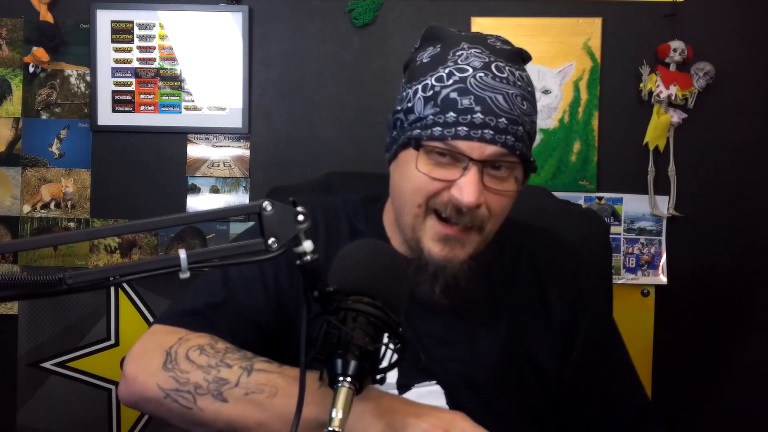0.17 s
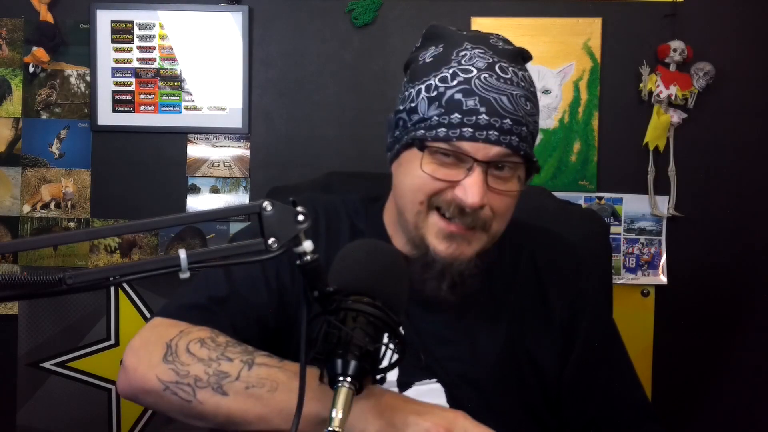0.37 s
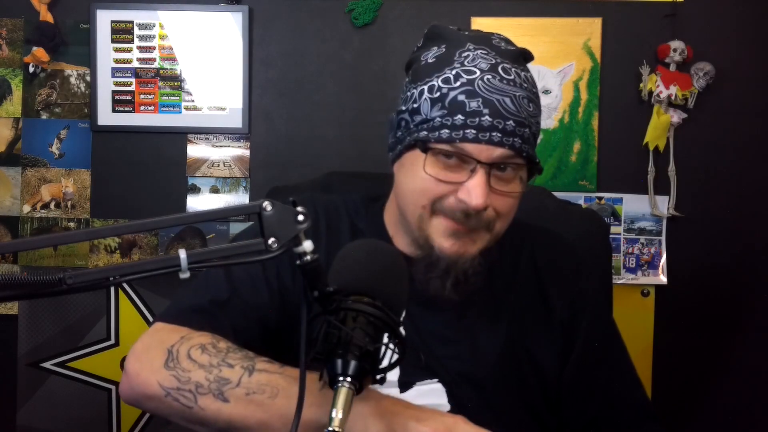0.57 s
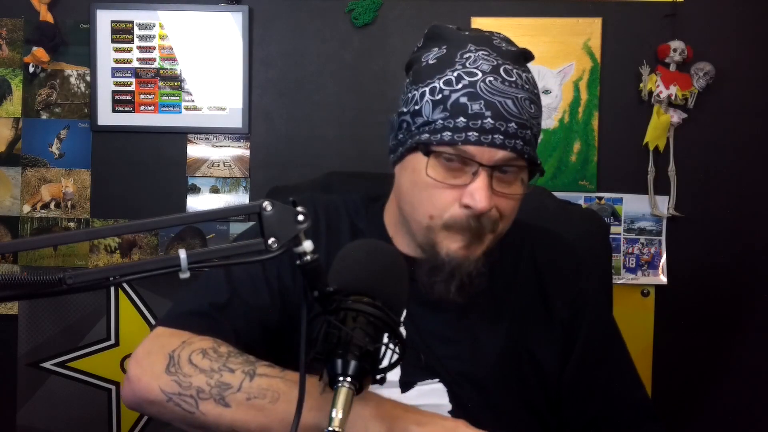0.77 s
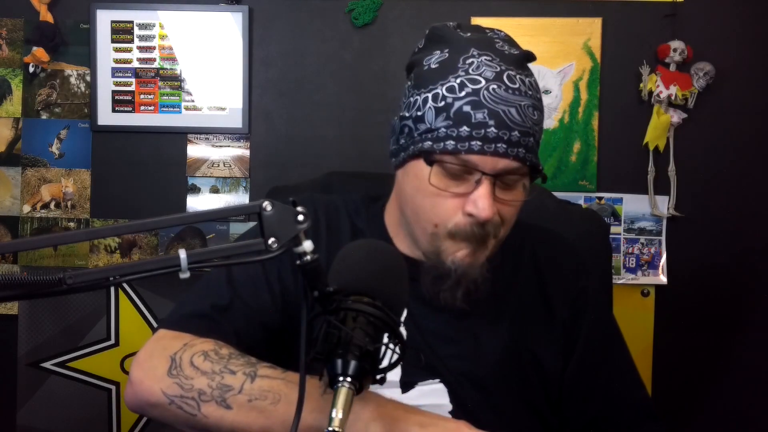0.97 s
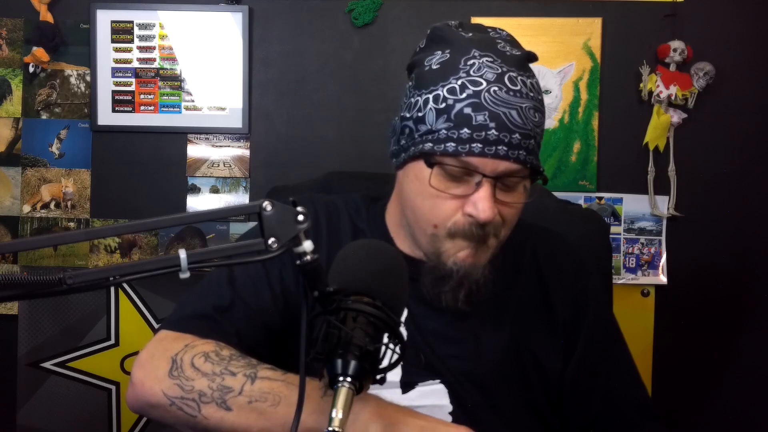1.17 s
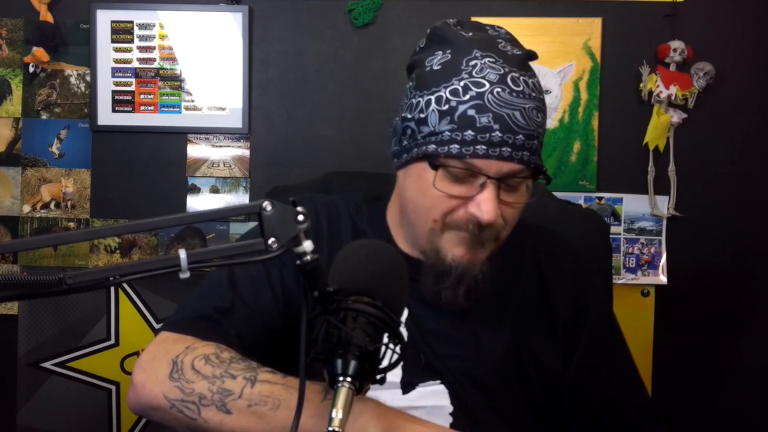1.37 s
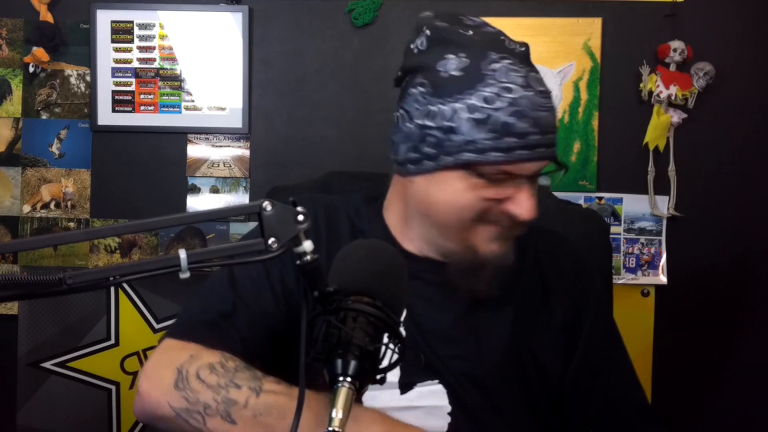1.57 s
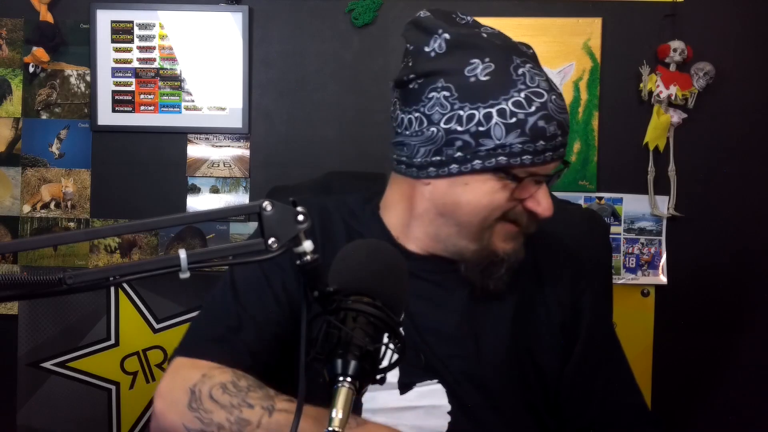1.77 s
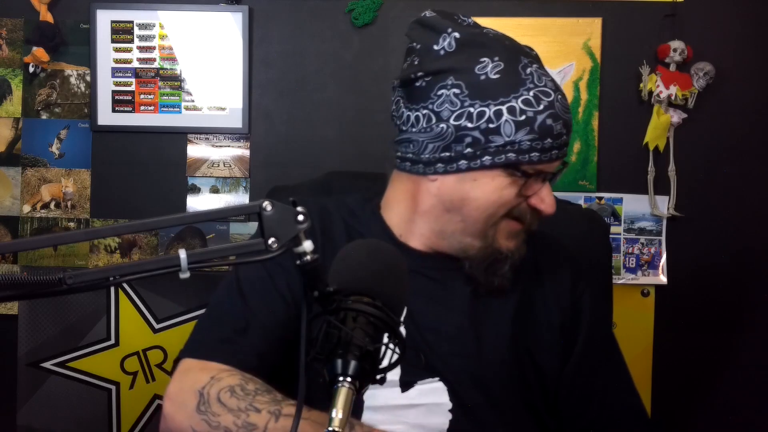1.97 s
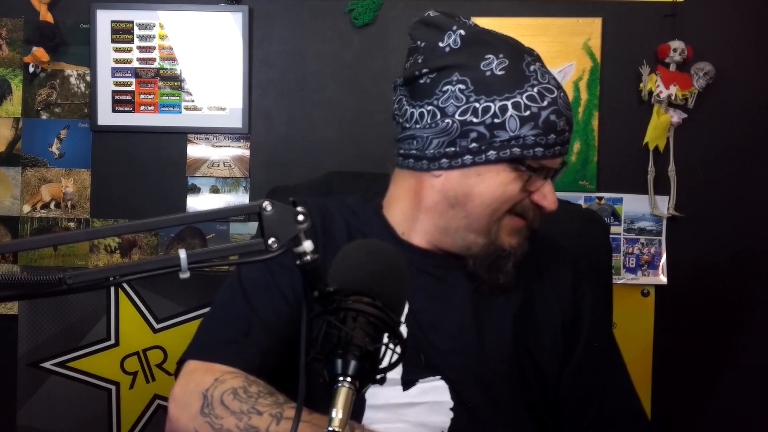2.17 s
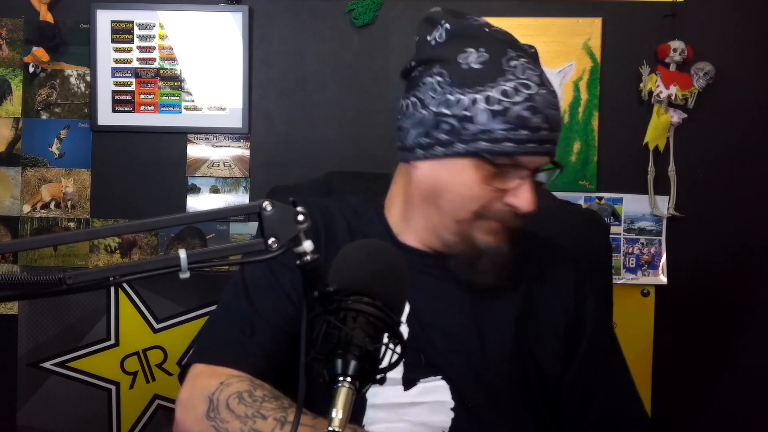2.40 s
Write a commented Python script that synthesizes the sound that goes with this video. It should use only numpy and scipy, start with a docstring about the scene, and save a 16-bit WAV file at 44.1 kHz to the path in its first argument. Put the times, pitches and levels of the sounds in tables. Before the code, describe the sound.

A drink can gives two sharp metallic clicks at its tab, with dull bumps coming through a desk. Faint ticks follow over a low hum, until the can clatters down loudly, ringing briefly in a small room.

```python
"""First a pull tab snaps and rings among soft thumps; then the aluminium can's lid cracks and ticks faintly.
At the end the can lands with a loud clatter. Thin metal giving way or hitting makes bursts of
noise, and its vibration makes the ringing. The thumps come through the desk, over a low wavering hum.
A small hard room prolongs every click, and the loudest peaks are squashed."""
import sys
import numpy as np
from scipy import signal
from scipy.fft import rfft, irfft, next_fast_len
from scipy.io import wavfile
from scipy.ndimage import map_coordinates

SR = 44100
rng = np.random.default_rng(int(sys.argv[2]) if len(sys.argv) > 2 else 0)


def bounce(signal):
    """Save signal as a 16-bit WAV file at the path given by the first command-line argument."""
    frames = np.transpose(np.atleast_2d(signal))
    limited = np.clip(frames, -1, 1)
    pcm = np.round(limited * 32767).astype(np.int16)
    wavfile.write(sys.argv[1], SR, pcm)


N = 107427
TIME = np.arange(N) / SR

# How strong the snap is from bass to treble (frequency [Hz], relative level [dB])
SNAP_TONE = [(200, -38), (420, -58), (560, -32), (940, -30), (1740, -13), (2470, -24.5), (2900, -16.5),
             (3180, -17), (3550, 1), (3960, -12), (5010, -7.5), (5800, -17.5), (7500, -15), (8300, -11.5),
             (10900, -10.5), (11800, -23), (14500, -27), (15500, -44)]
# How wide the snap sounds (frequency [Hz], side level over middle [dB])
SNAP_WIDTH = [(60, -17), (130, -11), (290, -10), (640, -28), (1410, -13), (3100, -3), (6820, 1),
              (15000, -30)]
# The lid's own notes; a fade time is a drop of 60 dB (pitch [Hz], relative level [dB], fade time [s])
LID_NOTES = [(1793, -23, .4), (2922, -3.5, .3), (3454, -5, .3), (3478, 0, .35), (3518, -1, .33),
             (3676, -11, .3), (5202, -11, .22), (8358, -13, .26), (9767, -14, .22)]


def tab_snap(start=0.1067):
    """The tab gives way with a snap and sets the lid ringing."""
    body = burst(start, SNAP_TONE, SNAP_WIDTH, hold_s=0.059, grain_db=-0.5, sag_db_per_s=54)
    ringing = amp(-1) * ring(LID_NOTES, start)
    return amp(-17) * (body + ringing + sharp_click(start, db=2.5, fade_s=0.084))


# How strong the crack is from bass to treble (frequency [Hz], relative level [dB])
CRACK_TONE = [(120, -74), (200, -50), (293, -50), (414, -61), (618, -21.5), (1070, -25), (2130, -11),
              (2750, -20), (3180, -11.5), (4260, -14.5), (5390, -9), (6130, -11), (9480, -2),
              (14700, -24.5), (15500, -49)]
# How wide the crack sounds (frequency [Hz], side level over middle [dB])
CRACK_WIDTH = [(60, -17), (130, -13), (290, -9), (640, -21), (1410, -11.5), (3100, -2.5), (6820, 0.5),
               (15000, -27)]


def lid_crack(start=0.4495):
    """The lid cracks with a bright crunch and hardly rings."""
    body = burst(start, CRACK_TONE, CRACK_WIDTH, hold_s=0.05, grain_db=0, sag_db_per_s=40)
    ringing = amp(-27) * ring(LID_NOTES, start)
    return amp(-17.5) * (body + ringing + sharp_click(start, db=3, fade_s=0.028))


# Each hit of the landing can (time [s], level [dB])
LANDING_HITS = [(2.3285, -13.5), (2.3394, -15), (2.362, -23), (2.378, -19.5), (2.397, -22.5)]
# How strong a hit is from bass to treble (frequency [Hz], relative level [dB])
HIT_TONE = [(60, -38), (100, -8), (160, -8), (243, -11), (440, -11), (880, -8.5), (1100, -11.5),
            (1840, -11.5), (2400, -7.5), (3250, -.5), (4560, -10), (6500, -8.5), (8400, -1.5),
            (9700, -14.5), (11000, -5), (12000, -14.5), (13800, -13), (15500, -15)]
# How wide a hit sounds (frequency [Hz], side level over middle [dB])
HIT_WIDTH = [(60, -10), (110, 8), (200, -1.5), (380, -1), (700, 1), (1290, -1.5), (2380, -4.5), (4400, -1),
             (8120, 1.5), (15000, -1.5)]
# The notes of the can's wall (pitch [Hz], relative level [dB], fade time [s])
WALL_NOTES = [(2649, -4, .4), (2876, -1, .4), (3006, -2, .5), (3212, 0, .5), (3364, 0, .4), (3561, 0, .45),
              (3822, -4, .3), (6990, -6, .4), (7831, -4, .4), (8313, -4, .3), (8378, -4, .3),
              (8876, -4, .3), (10905, -5, .3), (15390, -8, .2)]
# A slow swing of air pressure (from [amplitude], to [amplitude], turning time [s], turning length [s])
PRESSURE_SWING = (-.11, .22, 2.392, .018)


def can_landing():
    """The can clatters down in quick hits and its wall rings, over a slow swing of pressure."""
    start, first_hit_db = LANDING_HITS[0]
    clatter = sum(amp(db) * burst(hit, HIT_TONE, HIT_WIDTH, hold_s=0.03, grain_db=0.5, sag_db_per_s=70)
                  for hit, db in LANDING_HITS)
    ringing = amp(first_hit_db - 7.5) * ring(WALL_NOTES, start)
    before, after, turn_s, turn_length = PRESSURE_SWING
    progress = (1 + np.tanh((TIME - turn_s) / turn_length)) / 2
    pressure = before + (after - before) * progress
    fade_in = 1 - np.exp(-since(start) / 0.00067)
    return clatter + ringing + pressure * fade_in


# Bright chinks within the clatter (time [s], level [dB], rough pitch [Hz], fade time [s])
RIM_CHINKS = [(2.33, -10.5, 9440, 0.075), (2.3378, -6.5, 11200, 0.022), (2.391, -15, 9830, 0.14),
              (2.3995, -13.5, 9800, 0.19)]


def rim_chinks():
    """The rim catches and gives short, very high rings, each a narrow band of noise."""
    out = np.zeros((2, N))
    for start, db, hz, fade_s in RIM_CHINKS:
        age = since(start)
        tone = [(hz * 0.5, -70), (hz * 0.79, -25), (hz * 1.031, 0),
                (hz * 1.025, 0), (hz * 0.9, -25), (hz * 1.5, -60)]
        fade_in = 1 - np.exp(-age / 0.00073)
        out += amp(db - 60 * age / fade_s) * fade_in * noise(tone, width=[(1000, 1.3)])
    return out


# Small ticks (time [s], level [dB], pitch [Hz], spread each way [octaves], echo relative to tick [dB])
METAL_TICKS = [(0.65, -40, 9000, 0.33, -12), (0.659, -31, 9700, 0.25, -7), (0.6615, -40, 5900, 1, -2),
               (.688, -47.5, 730, 0.18, -6.5), (0.7318, -32.5, 9240, 0.18, -12), (0.7334, -46, 4200, 1, -2),
               (.765, -41, 8050, .6, -8.5), (1.652, -38.5, 5230, 0.28, -28),
               (1.652, -43.5, 9700, 0.26, -15), (1.7789, -28.5, 9400, 0.2, -16),
               (2.2835, -41, 10400, .15, -9)]


def metal_ticks(tick_fade_s=0.016, echo_fade_s=0.3):
    """The metal ticks under the fingers, and the room answers each tick."""
    out = np.zeros((2, N))
    for start, db, hz, octaves, echo_db in METAL_TICKS:
        age = since(start)
        low, high = hz / 2 ** octaves, hz * 2 ** octaves
        tone = [(low / 2, -57), (low, -9), (hz, 0), (high, -12), (high * 2, -57)]
        fade = amp(-60 * age / tick_fade_s) + amp(echo_db - 60 * age / echo_fade_s)
        scratch = unit(amp(1.5 * wobble(900)))
        out += amp(db) * fade * scratch * (age > 0) * noise(tone, width=[(1000, -4)])
    return out


# Soft thumps (peak time [s], level [dB], pitch [Hz], half length [s])
DESK_THUMPS = [(0.018, -28, 55.4, 0.036), (0.082, -26, 53.7, 0.019), (0.187, -25.5, 51, 0.042),
               (0.301, -30.5, 49.1, 0.073), (0.894, -20.5, 52.5, 0.048), (0.986, -28, 52.4, .04)]
# The bass-heavy rustle in each thump (frequency [Hz], relative level [dB])
RUSTLE_TONE = [(40, -2.5), (65, 10), (115, -1.5), (180, -16), (240, -24.5), (600, -60)]


def desk_thumps():
    """Soft, low bumps travel through the desk, each with a dull rustle."""
    boom = sum(amp(db) * swell(peak, half) * np.cos(2 * np.pi * hz * (TIME - peak))
               for peak, db, hz, half in DESK_THUMPS)
    force = sum(amp(db) * swell(peak, 1.87 * half) for peak, db, _, half in DESK_THUMPS)
    return boom + amp(-13) * force * noise(RUSTLE_TONE, width=[(100, -23)])


# How the deep hum rises and falls (time [s], relative level [dB])
HUM_LEVELS = [(0.0, -38), (0.15, -61), (0.19, -38), (0.42, -34.5), (0.48, -47), (0.55, -37), (0.85, -36.5),
              (0.89, -46), (1.05, -40), (1.15, -30.5), (1.64, -37.5), (1.73, -32.5), (1.93, -33),
              (1.99, -43), (2.09, -32), (2.21, -40.5), (2.26, -29), (2.32, -41.5)]
# Higher tones that swell over it (pitch [Hz], level [dB], peak time [s], half length [s])
HUM_OVERTONES = [(114, -42, 0.051, 0.23), (92, -46, 1.17, 0.2), (175, -49, 1.5, 0.28),
                 (177.7, -42.5, 0.912, 0.093), (244, -55, 1.895, 0.42), (330.4, -62, 1.4, 0.65)]


def low_hum(pitch_hz=34.3):
    """A deep hum wavers while higher tones come and go."""
    level_db = np.interp(TIME, *np.transpose(HUM_LEVELS)) + 4.5
    hum = amp(level_db) * np.sin(2 * np.pi * pitch_hz * TIME + 0.43 * wobble(5.76))
    for hz, db, peak, half in HUM_OVERTONES:
        hum += amp(db) * swell(peak, half) * np.sin(2 * np.pi * hz * TIME + 0.54 * wobble(11))
    return hum


# How strong the room noise is from bass to treble (frequency [Hz], relative level [dB])
ROOM_NOISE_TONE = [(35, -10), (60, 2.5), (100, -3.5), (140, -3.5), (200, -11), (300, -18), (590, -22.5),
                   (960, -19.5), (1200, -24), (2200, -26.5), (4500, -28.5), (7300, -30.5), (9300, -26.5),
                   (11500, -29.5), (14700, -28), (15800, -32)]
# How wide the room noise sounds (frequency [Hz], side level over middle [dB])
ROOM_NOISE_WIDTH = [(60, -5), (110, -23), (200, -12), (380, -6), (700, -9), (1290, -7), (2380, -3.5),
                    (4400, 0), (8120, -6.5), (15000, -56)]


def room_noise():
    """A faint, steady rumble and hiss fill the room."""
    return amp(-44) * noise(ROOM_NOISE_TONE, ROOM_NOISE_WIDTH)


# How long the room keeps a sound going (frequency [Hz], fade time [s])
ROOM_FADE = [(300, 0.13), (1800, 0.4), (4000, 0.31), (9000, 0.27), (14000, 0.17)]


def burst(start, tone, width, hold_s, grain_db, sag_db_per_s):
    """Thin metal gives a burst of noise; close walls hold it up briefly, then it dies away."""
    age = since(start)
    grain = unit(amp(grain_db * wobble(1300)))
    hz, times, spectrum = signal.stft(noise(tone, width), SR, nperseg=256)
    # After the hold, each frequency fades at the room's own speed.
    fade_db = -60 * np.maximum(times - (start + hold_s), 0) / along(ROOM_FADE, hz)[:, None]
    fading = signal.istft(spectrum * amp(fade_db), SR, nperseg=256)[1][:, :N]
    sag = amp(-sag_db_per_s * np.minimum(age, hold_s))
    return fading * grain * sag * (age > 0)


# The bright click that starts the snap and the crack (frequency [Hz], relative level [dB])
CLICK_TONE = [(100, -13.5), (900, 0), (4000, 5), (11000, 7.5), (15500, -1.5)]


def sharp_click(start, db, fade_s):
    """The instant of contact makes a short click that reaches from bass to treble."""
    age = since(start)
    return amp(db - 60 * age / fade_s) * (age > 0) * noise(CLICK_TONE, width=[(1000, -2)])


def ring(notes, start):
    """Struck metal rings at its own fading notes, which reach left and right slightly out of step."""
    age = since(start)
    out = np.zeros((2, N))
    for hz, db, fade_s in notes:
        phase = rng.uniform(0, 2 * np.pi) + rng.normal(0, 1.0, (2, 1))
        flutter = 0.1 * wobble(52)
        out += amp(db - 60 * age / fade_s) * np.sin(2 * np.pi * hz * age + phase + flutter)
    starting_strength = np.sqrt(np.sum(amp(np.array(notes)[:, 1]) ** 2) / 2)
    return out * (age > 0) / starting_strength


def noise(tone, width):
    """Stereo noise of strength 1: both ears share the middle, and the side makes them differ."""
    def middle_and_side(hz):
        angle = np.arctan(amp(along(width, hz)))
        return amp(along(tone, hz)) * [np.cos(angle), np.sin(angle)]
    middle, side = filtered(rng.standard_normal((2, N)), middle_and_side)
    return unit(np.array([middle + side, middle - side]))


def filtered(sound, gain_at):
    """Turn each frequency up or down by gain_at(hz)."""
    size = next_fast_len(N + 8192)
    hz = np.fft.rfftfreq(size, 1 / SR)
    return irfft(rfft(sound, size) * gain_at(hz), size)[..., :N]


def wobble(rate):
    """A smooth curve through `rate` random points a second."""
    points = rng.standard_normal(int(N * rate / SR) + 4)
    return map_coordinates(points, [TIME * rate])


def swell(peak, half_length):
    """A bell-shaped rise and fall, about a third as high half_length seconds from its peak."""
    return np.exp(-((TIME - peak) / half_length) ** 2)


def since(start):
    """Seconds since the start, zero before it."""
    return np.maximum(TIME - start, 0)


def along(points, hz):
    """Read between (frequency, value) points, with octaves evenly spaced."""
    frequencies, values = np.transpose(points)
    return np.interp(np.log(hz + 1), np.log(frequencies + 1), values)


def unit(sound):
    """Scale to an average strength (rms) of 1."""
    return sound / np.sqrt(np.mean(sound ** 2) + 1e-20)


def amp(db):
    """Turn decibels into a number to multiply by."""
    return 10 ** (np.asarray(db) / 20)


def scene():
    """The can, the desk and the background together."""
    can = tab_snap() + lid_crack() + metal_ticks() + can_landing() + rim_chinks()
    return can + desk_thumps() + low_hum() + room_noise()


def record(dry, ceiling=0.9, top_hz=15900):
    """Gently squash the loudest peaks, then cut off the very highest treble."""
    squashed = dry / (1 + np.abs(dry / ceiling) ** 4) ** (1 / 4)
    return filtered(squashed, lambda hz: 1 / np.sqrt(1 + (hz / top_hz) ** 160))


dry = scene()
out = record(dry)
bounce(out)
```